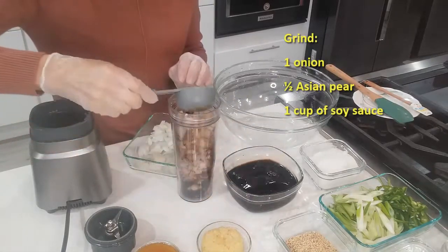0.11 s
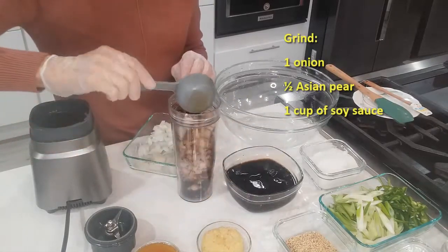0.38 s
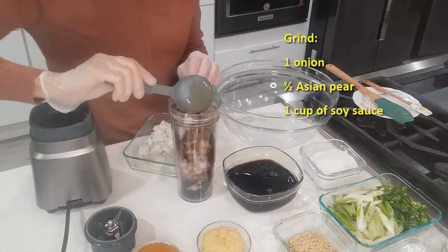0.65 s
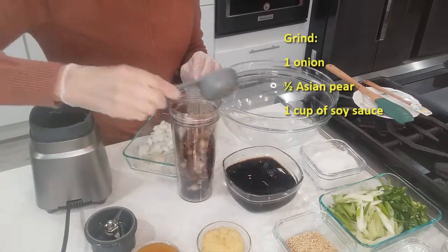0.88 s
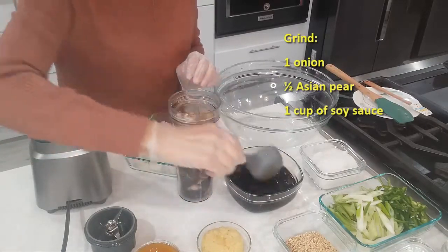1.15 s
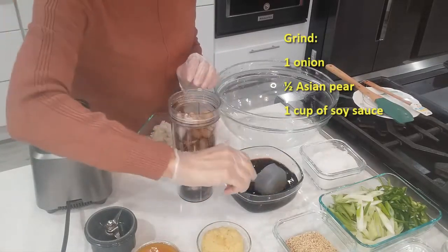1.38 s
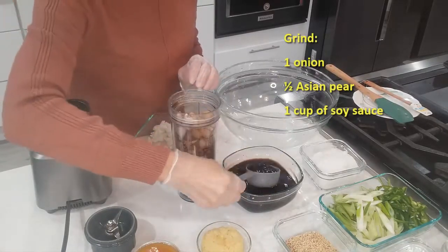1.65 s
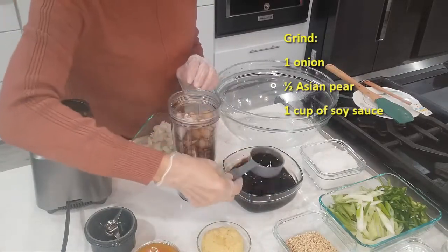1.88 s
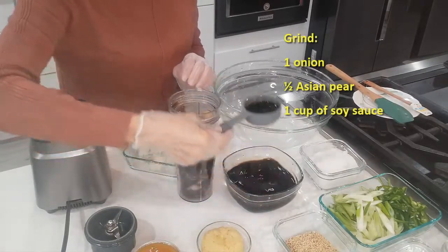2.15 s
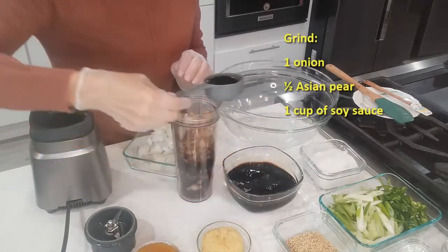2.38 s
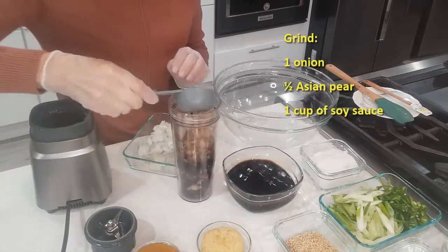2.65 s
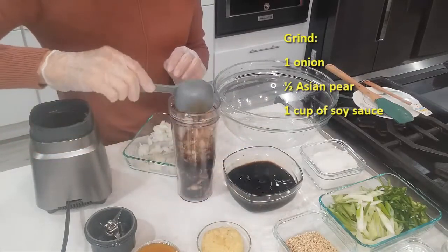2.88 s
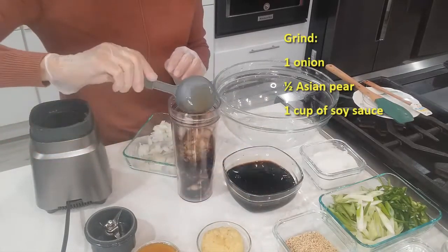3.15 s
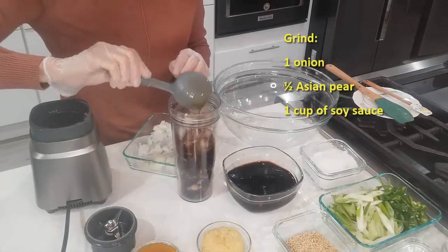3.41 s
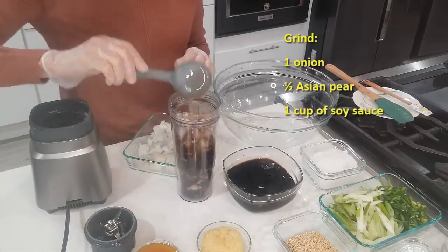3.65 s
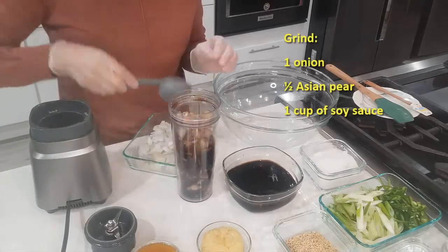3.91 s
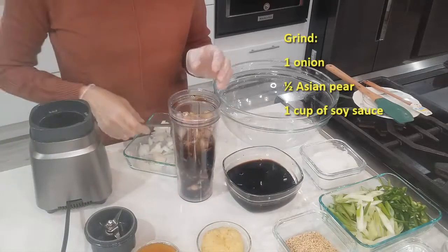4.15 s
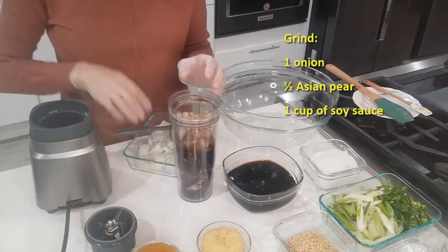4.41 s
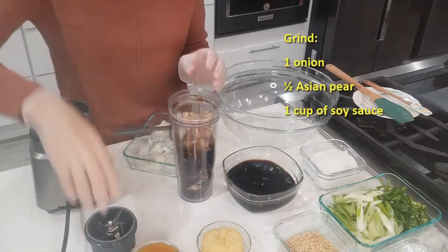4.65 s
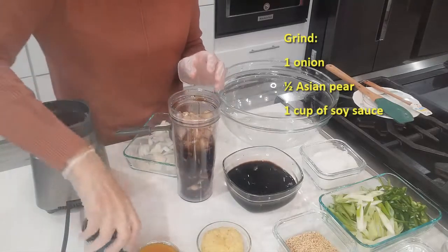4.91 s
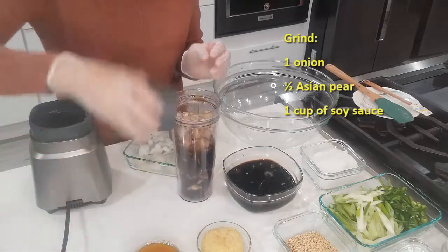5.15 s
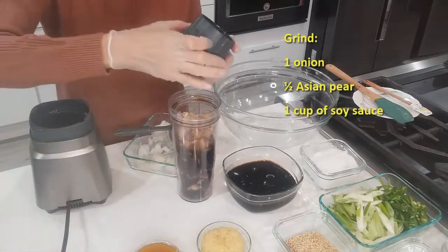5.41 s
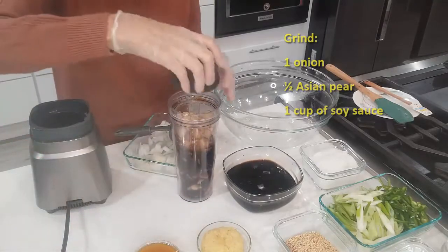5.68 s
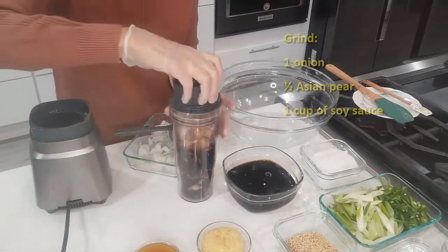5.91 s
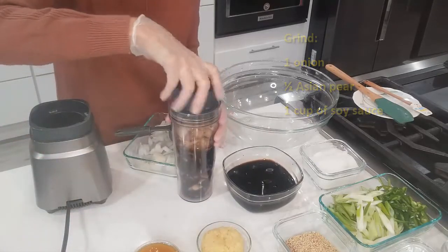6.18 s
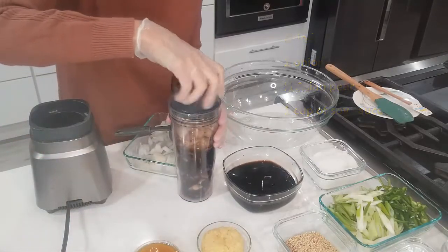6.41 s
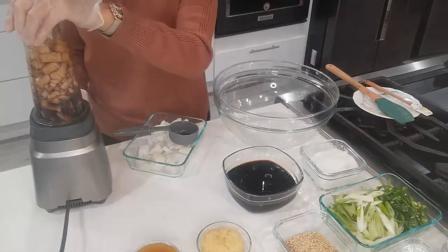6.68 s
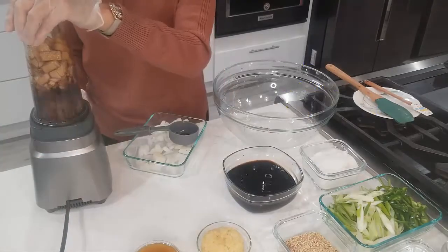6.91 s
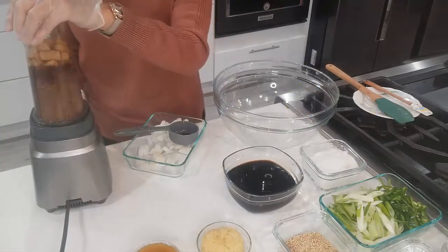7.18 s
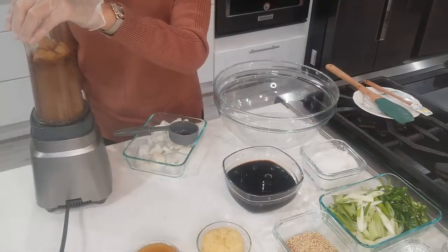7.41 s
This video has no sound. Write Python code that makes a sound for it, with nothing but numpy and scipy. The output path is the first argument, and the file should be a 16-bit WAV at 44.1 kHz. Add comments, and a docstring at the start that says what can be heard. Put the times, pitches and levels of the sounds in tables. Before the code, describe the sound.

Very faint liquid bubbles, thin glove crinkles and soft plastic rim taps sit just above quiet room noise. Around the middle, a handle knock is followed by a bright clattering clink in a glass dish. After a pause, a lid clatters and scrapes onto a cup, with soft bumps as it meets the base. A loud small motor then chops and churns, rising in pitch, close and slightly left in a reflective kitchen.

```python
"""A quiet kitchen, close-up in stereo: room rumble and hiss lie under everything as sauce is ladled into a plastic cup.
Drips sing as rising bubbles, gloves rustle as filtered crinkles, and the scoop rings the rim as decaying modes
among faint high ticks; its handle knocks and it is laid in a glass dish. The blade lid rattles onto the cup with
a grainy scrape, the cup bumps into its base, and the motor starts: shaft and supply tones over noisy, chopped chunks.
The handling rings in a hard, small room."""
import sys
import numpy as np
from scipy import signal
from scipy.io import wavfile
from scipy.ndimage import uniform_filter1d

SR = 44100
rng = np.random.default_rng(int(sys.argv[2]) if len(sys.argv) > 2 else 0)


def unload_audio(sound):
    """Save the sound as a 16-bit wav file, at the path given as the first command line argument."""
    columns = np.transpose(np.atleast_2d(sound))
    # keep every value between -1 and 1, then stretch to whole-number steps
    steps = np.round(np.clip(columns, -1, 1) * 32767)
    wavfile.write(sys.argv[1], SR, steps.astype(np.int16))


def elevation(decibels):
    """Turn decibel levels (scalar or array-like) into linear amplitude ratios."""
    levels = np.asarray(decibels, float)
    return 10 ** (levels / 20)


N = 332955  # samples

# Levels of handling sounds are those ahead of the room.
# Tilt of the room bed: (frequency [Hz], relative level [dB per Hz])
AIR_SPECTRUM = [(12, -44), (20, -5), (127, -2), (210, -17.5), (241, -12.5), (434, -21.5), (485, -26),
                (590, -22), (660, -26.5), (738, -27), (1530, -30), (2910, -31), (4060, -32.5),
                (14700, -32.5), (16000, -35.5)]
# Left-right likeness of the room bed: (frequency [Hz], likeness [0 to 1])
AIR_LIKENESS = [(60, 0.82), (240, 0.74), (950, 0.0038), (3770, 0), (15000, 0.057)]
# Room decay: (frequency [Hz], time to fall 60 dB [s])
ROOM_DECAY = [(150, 0.49), (500, 0.41), (1500, 0.43), (4000, 0.44), (12000, 0.33)]
# Sauce drips and plops: (time [s], level [dB], middle bubble pitch [Hz])
DRIPS = [(0.136, -62, 3200), (0.183, -52, 3350), (0.23, -54, 3230), (0.339, -53, 3150), (0.385, -55, 2880),
         (0.385, -60.5, 1150), (0.439, -52, 4620), (0.857, -52, 3290), (0.889, -51, 3140),
         (0.919, -56, 3160), (1.629, -61.5, 1300), (1.703, -55, 1850), (1.74, -43, 2160), (1.74, -43, 2830),
         (1.761, -53, 1970), (1.789, -65, 2400), (1.893, -57, 2840), (2.369, -62, 2860), (2.518, -61, 3000),
         (2.76, -56, 1320), (2.819, -52.5, 6300), (2.929, -66, 1030), (3, -57, 1430)]
# Gloves, sleeves and sliding plastic: (peak time [s], level [dB], rise [s], fall [s], treble share [dB])
RUSTLES = [(0.182, -65.5, .02, 0.34, -19), (0.29, -67.5, .2, 0.25, -18), (0.392, -62.5, 0.16, 0.06, 1),
           (0.44, -60.5, .02, 0.14, 4), (2.822, -63.5, .16, 0.13, 4), (2.942, -67.5, .03, 0.27, 6.5),
           (3.2, -65, .025, 0.061, -9), (3.441, -59.5, 0.01, 0.14, 1), (4.776, -69, .075, 0.3, 12.5),
           (4.948, -62, .03, .11, -16), (5.122, -70, .03, 0.32, -8), (5.346, -67.5, 0.096, 0.19, 17.5),
           (5.424, -72, 0.22, 0.23, 3.5), (6.484, -66, 0.43, 0.08, 5.5), (6.604, -44.5, 0.024, 0.05, 6.5),
           (6.628, -50, .03, 0.16, -17)]
# The scoop taps the rim and rebounds softly:
# (time [s], peak [dB], pitch the contact favours [Hz], rebound relative to the tap [dB])
RIM_TAPS = [(0.283, -51.5, 842, 5), (0.81, -47.5, 600, -0.5), (1.419, -46.5, 1700, -12),
            (1.528, -46, 589, -0.5), (2.07, -46.5, 587, 0), (3.501, -41.5, 575, -25)]
# Taps of the scoop handle: (time [s], peak [dB])
HANDLE_TAPS = [(4.093, -33.5), (4.096, -26), (4.16, -40.5)]
# The scoop is laid in the glass dish: (time [s], peak [dB])
DISH_TAPS = [(4.328, -37.5), (4.353, -16.5), (4.361, -23), (4.384, -18), (4.398, -26.5), (4.411, -33),
             (4.439, -40)]
# Ringing modes of each struck thing: (frequency [Hz], relative level [dB], time to fall 60 dB [s])
RIM_MODES = [(418, -2.5, 0.033), (592, 1, 0.081), (755, 16, 0.013), (976, 2.5, 0.0091), (1280, 4.5, 0.01),
             (1510, -5, 0.032), (1800, 5, 0.015), (2050, -14, 0.029), (2150, 2, 0.028)]
HANDLE_MODES = [(300, -12, 0.026), (620, -9, 0.04), (790, -6, 0.047), (1030, -2, 0.021), (1150, 0.5, 0.023),
                (1290, 5, 0.0086), (1708, 2, 0.077), (1730, -19, 0.78), (2200, -15, 0.017),
                (2630, -12, 0.027), (2800, -12, 0.025), (3170, -15, .02)]
DISH_MODES = [(238, 0, 0.035), (400, -3, 0.02), (650, -12, 0.023), (890, -5.5, 0.015), (1100, 3.5, 0.021),
              (1174, 2.5, 0.073), (1175, 5, 0.024), (1520, -4, 0.012), (1800, 2, 0.014), (2050, -2, 0.019),
              (2204, -6.5, 0.11), (2240, -11, 0.3), (2650, -2.5, 0.015), (3140, -0.5, 0.013),
              (3440, -2, 0.03), (4100, -6, 0.022), (5150, -30, 0.0091)]
LID_MODES = [(76, -15, 0.087), (125, -0.5, 0.068), (180, -5.5, 0.045), (243, -1.5, 0.039),
             (359, -0.5, 0.015), (460, -7.5, 0.028), (539, -3, 0.025), (790, -19, 0.0034),
             (1150, 0.5, 0.0073), (1650, -9, 0.015), (2400, 3.5, 0.0084), (2560, -13, 0.035),
             (3130, 13, 0.0017), (4220, 11, .004), (6500, 3, 0.0012)]
# Faint high ticks: (time [s], level [dB], pitch [Hz])
TICKS = [(0.487, -37, 15300), (1.157, -42, 15400), (1.494, -43, 14000)]
# The lid lands, rattles into its thread and seats:
# (time [s], peak [dB], pitch the contact favours [Hz], softness [dB lost one octave away])
LID_KNOCKS = [(5.82, -17.5, 250, 0.1), (5.831, -24, 374, 1.5), (5.845, -22.5, 440, 4.1),
              (5.87, -24, 400, 6), (5.91, -27, 300, 1), (5.94, -25, 604, 2.4), (5.955, -23.5, 500, 4.5),
              (5.98, -26.5, 470, 3.5), (5.986, -23, 470, 15), (6.003, -39, 480, 12), (6.026, -44, 460, 12),
              (6.062, -12, 570, 3)]
# The lid turns in its thread, then the cup in the base: (peak time [s], level [dB], rise [s], fall [s])
TWISTS = [(5.826, -55, .006, 0.38), (6.5, -61.5, 0.044, 0.037), (6.606, -55, 0.075, 0.097)]
# The cup bumps into the base: (time [s], peak [dB])
BASE_BUMPS = [(6.28, -51), (6.402, -55), (6.417, -48), (6.449, -45.5), (6.489, -55), (6.509, -49)]
# Motor course: (time [s], relative load level [dB], brightness of the churn [dB])
MOTOR = [(6.8, -30.5, 9), (6.812, -20, -10.5), (6.85, -18, -13.5), (6.94, -16, -14.5), (7.148, -13, -13),
         (7.24, -14.5, -14), (7.55, -13.5, -17.5)]
# Make-up of each motor tone: (multiple of shaft turns [count], multiple of supply throbs [count])
TONES = [(0, 1), (0, 3), (1, 0), (1, 1), (2, 0), (2, 1), (3, 0), (4, 0), (1, 4), (6, 0), (8, 0)]
# Where the housing favours each of those tones: (relative level [dB], shaft speed [Hz])
FAVOURED = [(-9.5, 121), (-2, 124), (-10.5, 137.7), (-4.5, 140), (-7.5, 142), (-4, 138.4), (-6.5, 146.5),
            (-7.5, 140), (-7.5, 130), (-11.5, 155), (-7, 162)]
# Blade blows heard through cup, base and counter: (frequency [Hz], relative level [dB per Hz])
CHOP_SPECTRUM = [(24, -44), (40, -28), (114, -10), (189, -17), (258, -11.5), (326, -7), (419, -1.5),
                 (527, -9), (598, -4.5), (968, -8), (1220, -7.5), (1380, -12.5), (1780, -7), (2390, -15),
                 (6000, -28), (7800, -85), (13200, -120)]
# Spray of pulp and cooling air: (frequency [Hz], relative level [dB per Hz])
CHURN_SPECTRUM = [(880, -14.5), (1500, -18), (1770, -11), (2040, -2.5), (2380, -12.5), (4390, -11),
                  (5900, -14.5), (6640, -12), (9750, -13), (14900, -15), (15800, -38)]

AIR_DB = -59.5  # rms of the two sides' mean, ahead of the left-right balance
GURGLE_S, BUBBLE_SPREAD = 0.021, 0.24  # how long bubbles keep coming, and their spread in log pitch
SWELL_DB = 25  # gained over each rise time and lost over each fall time
TAP_SOFT_DB, REBOUND_S, REBOUND_HZ = 3.2, 0.012, 590
BUMP_HZ, BUMP_SOFT_DB = 230, 12
SWITCH_S, GRIP_S = 6.8005, 6.811  # the contact closes; the drive takes up the blades
THROB_HZ = 119.5  # the torque throbs at twice the supply frequency
START_HZ, FREE_HZ, RUN_UP_S = 108, 160, 0.25  # the shaft closes in on its free speed as the chunks break down
OFF_PEAK_HZ = 17.8  # a tone loses 5.6 dB this far from its favoured speed


def evened(x):
    """Scales to rms 1."""
    return x / np.sqrt(np.mean(x ** 2) + 1e-20)


def read(points, hz):
    """Reads a table on a log-frequency axis."""
    f, value = np.transpose(points)
    return np.interp(np.log(hz + 1), np.log(f + 1), value)


def add(mix, s, sound):
    """Mixes a sound in at s seconds."""
    part = mix[round(s * SR):][:len(sound)]
    part += sound[:len(part)]


def coloured(x, points):
    """Minimum-phase filter with the given spectrum: a click rings after its start, never before."""
    hz = abs(np.fft.fftfreq(2 ** 12, 1 / SR))
    log_gain = np.log(elevation(np.maximum(read(points, hz), -100)))
    response = np.exp(np.conj(signal.hilbert(log_gain)))
    return signal.oaconvolve(x, np.fft.ifft(response).real)[:len(x)]


def band(x, lo_hz, hi_hz):
    """Band-pass."""
    sos = signal.butter(2, [lo_hz, min(hi_hz, 0.45 * SR)], "band", fs=SR, output="sos")
    return signal.sosfilt(sos, x)


def wander(count, rate_hz):
    """Slow random drift of rms 1: noise through a one-pole low-pass."""
    pole = np.exp(-2 * np.pi * rate_hz / SR)
    return evened(signal.lfilter([1], [1, -pole], rng.standard_normal(count)))


def clicks(count, per_s, spread_db):
    """Sparse clicks of random sign, a few of them large."""
    size = elevation(spread_db * np.minimum(rng.exponential(1, count), 4))
    sign = rng.choice([-1., 1.], count)
    return size * sign * (rng.random(count) < per_s / SR)


def swell(s, db, rise, fall):
    """A gain that climbs to its peak at s and dies away."""
    t = np.arange(N) / SR - s
    away = np.maximum(t / fall, -t / rise)
    return elevation(db - SWELL_DB * np.minimum(away, 4))


def air():
    """Low room rumble, alike in both ears, and microphone hiss, unlike, drifting in soft spectral patches."""
    frames, hz = N // 512 + 5, np.fft.rfftfreq(2048, 1 / SR)
    a, b, c, d, patches = rng.standard_normal((frames, 1025, 5)).T
    patches = uniform_filter1d(patches, size=30, axis=0)  # smooth over frequency
    patches = evened(uniform_filter1d(patches, size=10, axis=1))  # then over time
    same = np.clip(read(AIR_LIKENESS, hz), -1, 1)[:, None]
    left = a + 1j * b
    right = same * left + np.sqrt(1 - same ** 2) * (c + 1j * d)
    z = np.array([left, right])
    z *= elevation(read(AIR_SPECTRUM, hz)[:, None] + 0.64 * patches) / np.sqrt(1 + same)
    out = signal.istft(z, nperseg=2048, noverlap=1536)[1][:, :N]
    balance_db = np.array([[0.8], [-0.8]])
    return elevation(AIR_DB + balance_db) * out / np.sqrt(np.mean(out.mean(0) ** 2))


def drips():
    """Each drip traps a handful of bubbles whose pitch rises as they die."""
    out, t = np.zeros(N), np.arange(SR // 20) / SR
    for s, db, hz in DRIPS:
        for late, pitch, size in rng.random((10, 3)):
            f = hz * np.exp(BUBBLE_SPREAD * (pitch - 0.5))
            tone = np.sin(2 * np.pi * f * (t + 3 * t ** 2))
            bubble = tone * np.exp(-t * f / 7) * np.minimum(t * f, 1)  # fades in over one cycle
            add(out, s + late ** 2 * GURGLE_S, elevation(db - 2.9 * size - 1.55 * late) * bubble)
    return out


def rustle():
    """Dense crinkles of thin glove film, each movement with its own share of treble."""
    grain = evened(clicks(N, 3000, 4.4)) + 0.33 * rng.standard_normal(N)
    body = evened(band(grain, 2800, 8900))
    treble = evened(band(grain, 6300, 21000))
    return sum(swell(*row) * (body + elevation(treble_db) * treble) for *row, treble_db in RUSTLES)


def blows(events, modes, crack_db, chatter_s):
    """A firm first touch and a short chatter ring the modes; a soft contact rings only those near its pitch."""
    out, t = np.zeros(N), np.arange(SR // 2) / SR
    hz, mode_db, t60 = np.transpose(modes)[:, :, None]
    for s, db, contact_hz, soft_db in events:
        reach_db = -soft_db * np.log2(hz / contact_hz) ** 2
        waves = np.sin(2 * np.pi * (hz * t + rng.random(hz.shape)))
        ring = (elevation(mode_db + reach_db - 60 * t / t60) * waves).sum(0)
        touches = rng.standard_normal(SR // 10) * np.exp(-t[:SR // 10] / chatter_s)
        touches[0] = 1.47 * np.linalg.norm(touches)
        sound = signal.oaconvolve(ring, touches)
        # the dull crack of the contact itself
        puff = rng.standard_normal(len(t)) * np.exp(-t / (0.97 * chatter_s))
        puff = band(puff, 140, 0.62 * contact_hz + 1500)
        crack_peak = elevation(crack_db - 2 * soft_db) * abs(sound).max()
        sound[:len(t)] += crack_peak * puff / abs(puff).max()
        sound = band(sound, 56, 18000)
        add(out, s, elevation(db) * sound / abs(sound).max())
    return out


def alike(taps, contact_hz, soft_db):
    """Blows that share one kind of contact."""
    return [(s, db, contact_hz, soft_db) for s, db in taps]


def scoop():
    """The scoop taps and rebounds from the rim, its handle knocks, and it lands in glass: three sets of modes."""
    taps = [(s, db, hz, TAP_SOFT_DB) for s, db, hz, _ in RIM_TAPS]
    rebounds = [(s + REBOUND_S, db + rebound_db) for s, db, _, rebound_db in RIM_TAPS]
    rim_events = taps + alike(rebounds, REBOUND_HZ, soft_db=13)
    rim = blows(rim_events, RIM_MODES, crack_db=-0.32, chatter_s=0.0061)
    handle_events = alike(HANDLE_TAPS, contact_hz=1490, soft_db=3.2)
    handle = blows(handle_events, HANDLE_MODES, crack_db=-9.0, chatter_s=0.0054)
    dish_events = alike(DISH_TAPS, contact_hz=1240, soft_db=3.3)
    dish = blows(dish_events, DISH_MODES, crack_db=-4.8, chatter_s=0.0074)
    return rim + handle + dish


def ticks():
    """Very short high clicks: dying bursts of band-passed noise."""
    out, t = np.zeros(N), np.arange(SR // 100) / SR
    for s, db, hz in TICKS:
        burst = band(rng.standard_normal(len(t)), 0.6 * hz, 1.3 * hz)
        add(out, s, elevation(db) * burst * np.exp(-t / 0.0027))
    return out


def cup():
    """The lid knocks on and scrapes round, then soft bumps against the base ring the same plastic modes."""
    knocks = blows(LID_KNOCKS, LID_MODES, crack_db=-4.9, chatter_s=0.0065)
    bump_events = alike(BASE_BUMPS, BUMP_HZ, BUMP_SOFT_DB)
    bumps = blows(bump_events, LID_MODES, crack_db=-13, chatter_s=0.008)
    return knocks + twist() + bumps


def twist():
    """Plastic scrapes on plastic: grainy slips from the mids to the low treble."""
    grain = evened(band(clicks(N, 1800, 3.7), 440, 2800))
    return sum(swell(*row) for row in TWISTS) * grain


def grind(shaft, bright_db):
    """Chunks struck by the blades, bunched once a turn, and the hiss of churned pulp."""
    count = len(shaft)
    sweep = 1 + 0.13 * np.cos(2 * np.pi * shaft)
    strikes = evened(clicks(count, 1500, 1.3) * sweep) + 1.55 * rng.standard_normal(count)
    chop = coloured(strikes, CHOP_SPECTRUM)
    spray = evened(clicks(count, 3300, 2.4)) * 1.2 + rng.standard_normal(count)
    hiss = coloured(spray, CHURN_SPECTRUM)
    splash_db = 1.8 * wander(count, 13)  # pulp slaps the wall in bursts
    return evened(chop) + elevation(bright_db + splash_db) * evened(hiss)


def motor_tones(t, speed, shaft):
    """Sines at sums of shaft and supply rates, each loudest at the speed where the housing favours it."""
    tones = np.zeros(len(t))
    for (turns, throbs), (db, hz) in zip(TONES, FAVOURED):
        level_db = db - 5.6 * ((speed - hz) / OFF_PEAK_HZ) ** 2 + 2.8 * wander(len(t), 16)
        cycles = turns * shaft + throbs * THROB_HZ * t + rng.random()
        tones += elevation(level_db) * np.sin(2 * np.pi * cycles)
    return tones


def blender():
    """Shaft and supply tones over the grinding; above the bass the walls bring each port its own jumble of it."""
    t = np.arange(SWITCH_S, N / SR, 1 / SR)
    s, load_db, bright_db = np.transpose(MOTOR)
    count, bright_db = len(t), np.interp(t, s, bright_db)
    speed = FREE_HZ - (FREE_HZ - START_HZ) * np.exp((SWITCH_S - t) / RUN_UP_S)
    shaft = np.cumsum(speed * (1 + 0.0036 * wander(count, 17))) / SR  # turns; chunks jolt the shaft
    direct = elevation(2) * grind(shaft, bright_db) + motor_tones(t, speed, shaft)
    wall_tilt = [(100, -15), (500, -9), (1500, 1.5), (5000, 6.5)]  # (frequency [Hz], gain [dB])
    walls = [coloured(grind(shaft, bright_db), wall_tilt) for port in "LR"]
    left = direct + walls[0]
    # the right port hears the direct sound 8 samples late, and the whole duller
    right = coloured(np.roll(direct, 8) + walls[1], [(150, 0), (1000, -2.5), (12000, -6)])
    grip = np.clip((t - GRIP_S) / 0.00092, 0, 1)  # the bass is held back until the drive grips
    bass = np.array([band(port, 30, 530) for port in (left, right)])
    out = np.zeros((2, N))
    out[:, -count:] = elevation(np.interp(t, s, load_db) - 3.0) * ([left, right] - (1 - grip) * bass)
    return out


def kitchen(x, room_db, pan_db, lag):
    """Direct sound reaches the left port first (lag in samples) and brighter; hard walls add a tail, alike in the bass."""
    taps = np.zeros((2, SR // 2))
    start = np.arange(60, SR // 2 - 20, 20)
    at = start + rng.integers(0, 20, (2, len(start)))  # one echo at random in every 20 samples
    np.put_along_axis(taps, at, rng.choice([-1., 1.], at.shape), 1)
    hz, t, z = signal.stft(taps, SR, nperseg=256)
    hz = hz[:, None]
    same = 1 / (1 + (hz / 700) ** 2)
    z[1] = same * z[0] + np.sqrt(1 - same ** 2) * z[1]
    z *= hz / (hz + 120)  # the small room feeds back little bass
    decay = elevation(-60 * t / read(ROOM_DECAY, hz))
    tail = signal.istft(z * decay, SR, nperseg=256)[1]
    tail *= elevation(room_db) / np.linalg.norm(tail[0])
    tail[0, 0] += 1  # direct sound
    tail[1, lag] += 1
    left, right = signal.fftconvolve(x[None], tail, axes=1)[:, :N]
    right = coloured(right, [(150, 0.0057), (1000, -0.5 * pan_db), (12000, -pan_db)])
    return np.array([left, right])


def scene():
    """All sources lean left: the blender and the handling, over the room bed."""
    small_sounds = kitchen(drips() + rustle() + ticks(), room_db=-1.0, pan_db=4, lag=2)
    scoop_in_room = kitchen(scoop(), room_db=2.5, pan_db=5.0, lag=2)
    cup_in_room = kitchen(cup(), room_db=-1.0, pan_db=4.5, lag=2)
    return air() + small_sounds + scoop_in_room + cup_in_room + blender()


def top_cut(x):
    """Nothing passes above the cut-off."""
    return signal.sosfilt(signal.butter(12, 16360, fs=SR, output="sos"), x)


def record(dry):
    """The microphones lose the deepest bass: a gentle roll-off below 55 Hz."""
    deep = signal.sosfilt(signal.butter(1, 55, fs=SR, output="sos"), dry)
    lean = dry - deep
    return top_cut(lean)


dry = scene()
out = record(dry)
unload_audio(out)
```